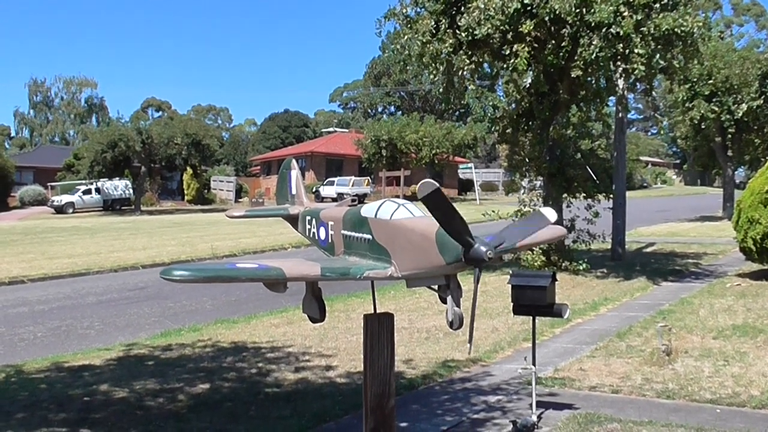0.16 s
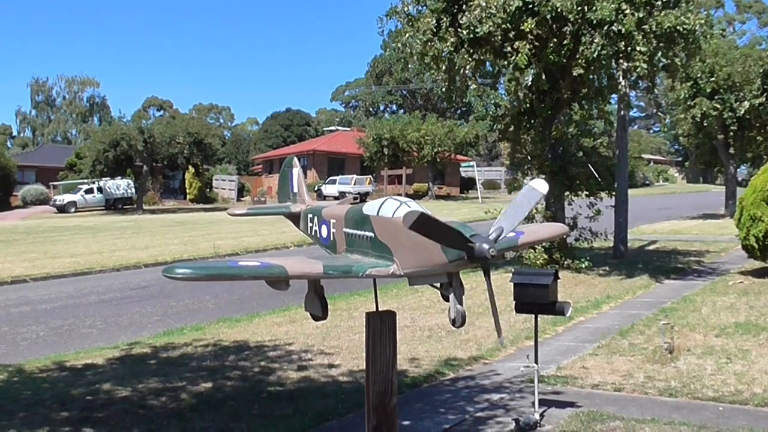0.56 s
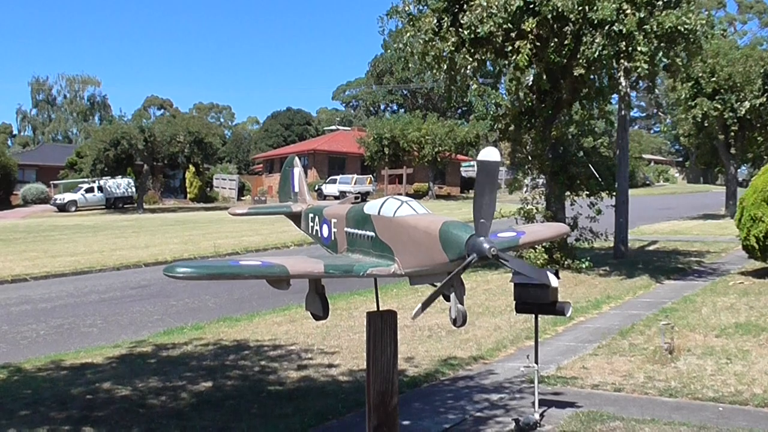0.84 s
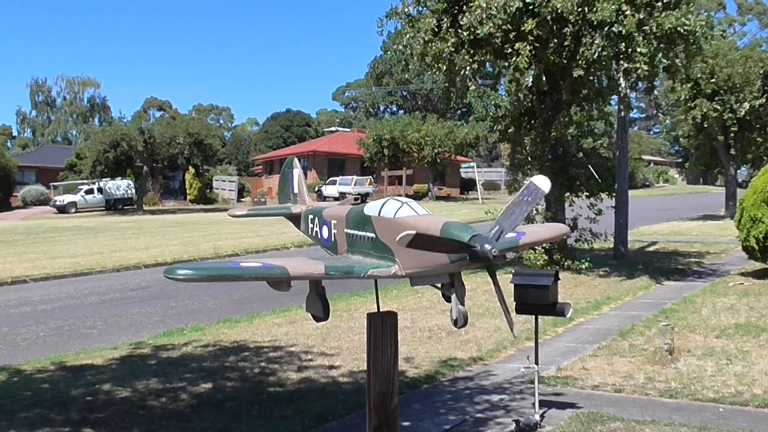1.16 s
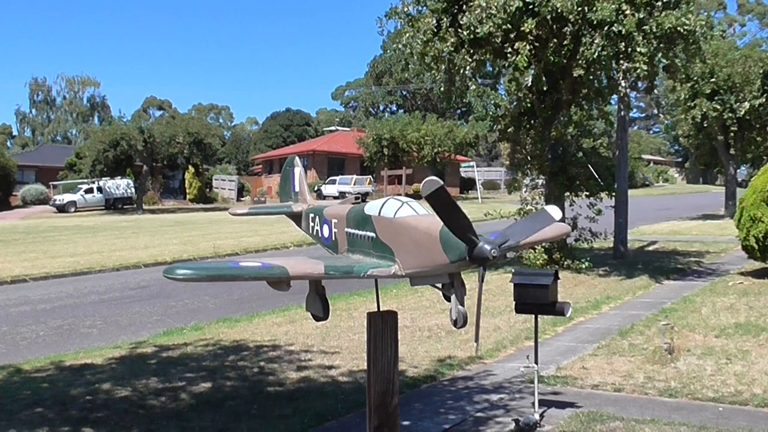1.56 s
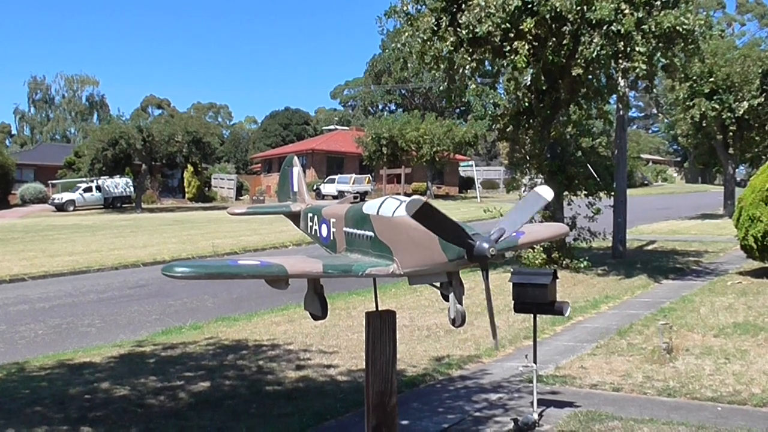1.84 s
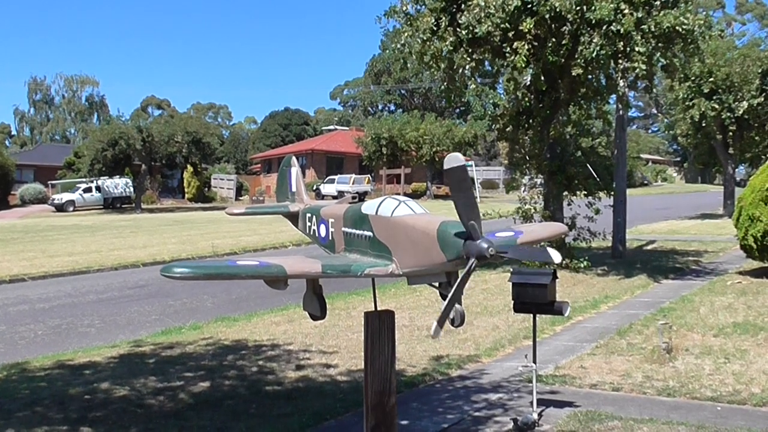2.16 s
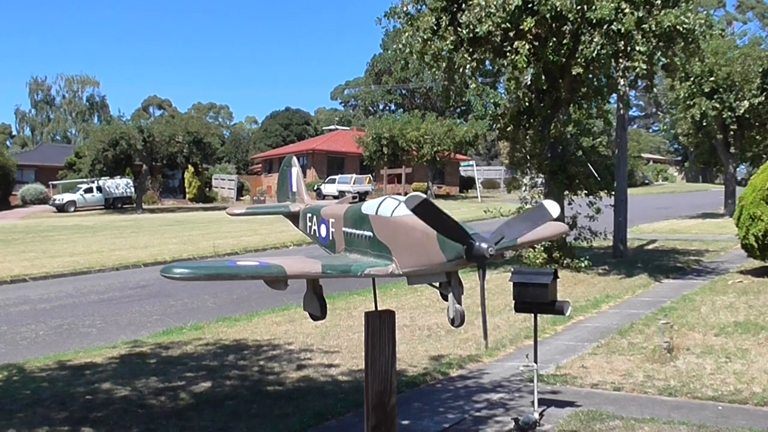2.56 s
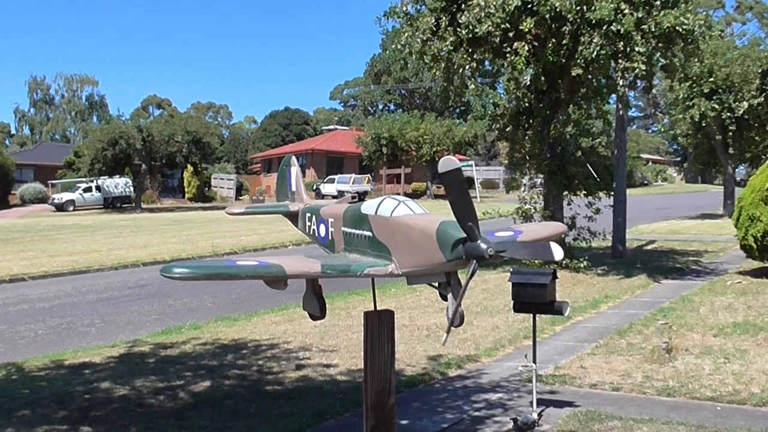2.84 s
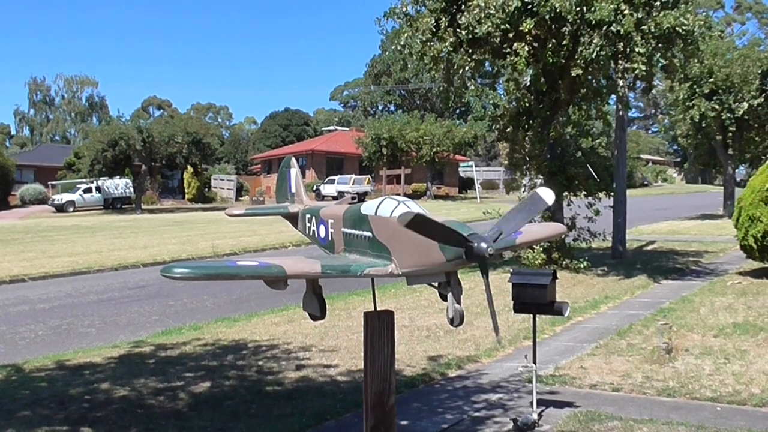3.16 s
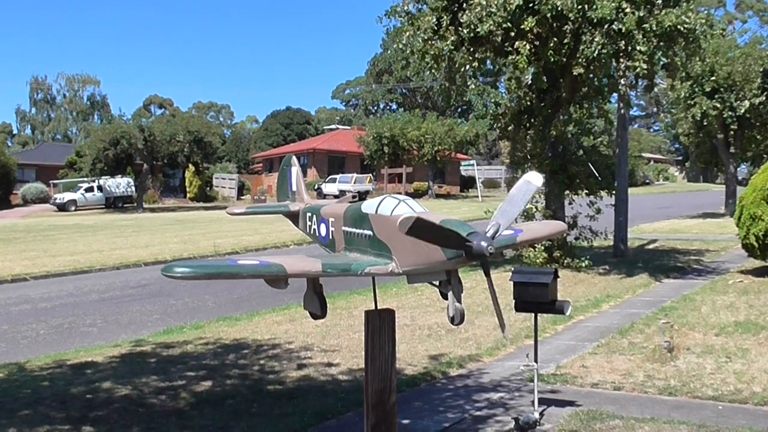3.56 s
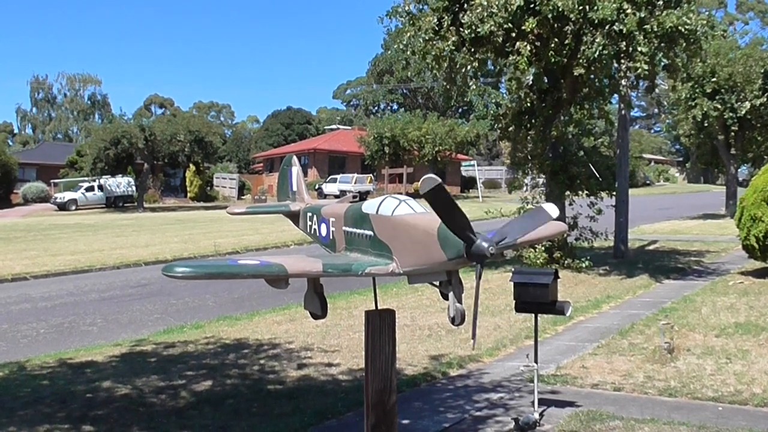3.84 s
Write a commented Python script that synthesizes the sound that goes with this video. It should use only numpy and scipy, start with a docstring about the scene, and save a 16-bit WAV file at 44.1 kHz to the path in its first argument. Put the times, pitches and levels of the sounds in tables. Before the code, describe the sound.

Wind buffets the microphone in gusts, with a whirligig's faint rattle and softly hissing leaves.

```python
"""Whirligig in a gusty yard

A model-aeroplane whirligig turns on a post: its loose propeller ticks and scrapes in the dry
bearing, and the shaft knocks the hollow body. Gusts buffet the two microphone ports, with a few
hard thumps from single eddies. Behind are a soft suburban hum, hissing leaves and faint birds."""
import sys
import numpy as np
from scipy.fft import rfft, irfft, next_fast_len
from scipy.io import wavfile
from scipy.ndimage import map_coordinates

SR = 44100
rng = np.random.default_rng(int(sys.argv[2]) if len(sys.argv) > 2 else 0)


def dump_mix(stems):
    """Bounce the given channels to the path in sys.argv[1] as a 16-bit WAV at rate SR."""
    frames = np.atleast_2d(stems).T  # one column per channel
    limited = np.clip(frames, -1, 1)  # hard clip at full scale
    pcm = np.round(limited * 32767).astype(np.int16)
    wavfile.write(sys.argv[1], SR, pcm)


N = 176400  # 4 s


def amp(db):
    """Decibels to gain."""
    return 10 ** (np.asarray(db) / 20)


def unit(x):
    """Scale to rms 1."""
    return x / np.sqrt(np.mean(x ** 2) + 1e-20)


def along(points, hz):
    """Read (freq_hz, value) points on a log axis."""
    freqs_hz, values = np.transpose(points)
    return np.interp(np.log(hz + 1), np.log(freqs_hz + 1), values)


def curves(rows):
    """One value per sample for each column after time_s."""
    time_s, *columns = np.transpose(rows)
    return [np.interp(np.arange(N) / SR, time_s, column) for column in columns]


def wobble(rate_hz):
    """Smooth random curve, rate_hz knots a second."""
    knots = rng.standard_normal(2048)
    return map_coordinates(knots, [np.arange(N) * rate_hz / SR], mode="wrap")


def filtered(x, response):
    """Apply a frequency response."""
    n = x.shape[-1]
    padded = next_fast_len(n + 4096)
    return irfft(rfft(x, padded) * response(np.fft.rfftfreq(padded, 1 / SR)), padded)[..., :n]


def tilted(x, db, pivot_hz):
    """Tilt by db per octave, out to one octave either side of the pivot."""
    return filtered(x, lambda hz: amp(db * np.clip(np.log2((hz + 1) / pivot_hz), -1, 1)))


def noise(spectrum, size=N, shift=1):
    """Coloured noise of rms 1; shift scales its frequencies."""
    return unit(filtered(rng.standard_normal(size), lambda hz: amp(along(spectrum, hz / shift))))


def stereo(mid, side, correlation, pan_db):
    """Mix two unrelated signals to a left-right pair; pan_db is left minus right."""
    angle = np.arccos(np.clip(correlation, -1, 1)) / 2
    mid, side = np.cos(angle) * mid, np.sin(angle) * side
    pair = np.array([(mid + side) * amp(pan_db / 2), (mid - side) * amp(-pan_db / 2)])
    return pair / np.sqrt((amp(pan_db) + amp(-pan_db)) / 2)


def add(track, start_s, sound):
    """Mix a sound into a track."""
    part = track[..., max(round(start_s * SR), 0):][..., :sound.shape[-1]]
    part += sound[..., :part.shape[-1]]


def ring(modes, t):
    """Damped modes; level, pitch and phase vary from blow to blow."""
    out = np.zeros(len(t))
    for hz, db, t60_s in modes:
        decay = amp(db + rng.normal(0, 3) - 60 * t / t60_s)
        out += decay * np.sin(2 * np.pi * (hz * rng.normal(1, 0.014) * t + rng.random()))
    return out


# Gust strength: time_s, level_db
GUSTS = [(0, -45), (0.25, -35.5), (0.41, -30), (0.6, -36.5), (0.7, -39), (0.78, -53), (0.95, -42.5),
         (1.1, -43.5), (1.3, -42.5), (1.42, -28.5), (1.6, -31.5), (1.7, -24.5), (1.88, -27.5),
         (1.97, -19.5), (2.12, -30.5), (2.29, -46.5), (2.37, -27.5), (2.49, -34.5), (2.59, -19.5),
         (2.7, -24.5), (2.84, -22.5), (3.0, -26.5), (3.24, -36), (3.5, -24.5), (3.63, -25.5), (3.7, -40.5),
         (3.82, -33), (4.0, -36.5)]
# Stereo image of the wind: time_s, pan_db, correlation
GUST_IMAGE = [(.3, -2.5, 0), (1.4, 2, 0.22), (1.62, -4.5, 0), (1.75, -0.5, 0.25), (2.0, -10.5, 0.02),
              (2.25, 9, 0.18), (2.4, -3.5, 0.14), (2.6, 4.5, 0.39), (2.75, 1.5, 1), (3.9, 0, 0.98)]
# Dull wide rumble and brighter centred buffeting: freq_hz, density_db
WIDE_SPECTRUM = [(15, -38), (30, -11), (55, -5), (90, 1), (150, -3), (240, -9.5), (400, -22), (600, -38),
                 (1500, -68)]
CENTRED_SPECTRUM = [(15, -45), (30, -13), (80, -2), (150, -3.5), (250, -2.5), (330, -6.5), (450, -14),
                    (600, -20.5), (1000, -34), (1500, -49), (4000, -93)]
WIDE_DB, CENTRED_DB = -1.5, -1
FLUTTER_DB, FLUTTER_HZ = 3, 70

def buffeting():
    """Turbulence on the ports flutters with small eddies; brighter where left and right become alike."""
    level_db, = curves(GUSTS)
    pan_db, correlation = curves(GUST_IMAGE)
    correlation = np.clip(correlation, 0, 1)
    def eddies():
        wide = amp(WIDE_DB) * np.sqrt(1 - correlation) * noise(WIDE_SPECTRUM)
        centred = amp(CENTRED_DB) * np.sqrt(correlation) * noise(CENTRED_SPECTRUM)
        return (wide + centred) * unit(amp(FLUTTER_DB * wobble(FLUTTER_HZ)))
    return amp(level_db) * stereo(eddies(), eddies(), correlation, pan_db)


# Left-right likeness of the background: freq_hz, correlation
YARD_CORRELATION = [(120, .2), (300, 1), (700, 1), (1400, 0.92), (5000, 0.97), (9000, 0.55), (14000, 0.13)]

def diffuse(spectrum):
    """Noise from all around, most alike left and right in the middle frequencies."""
    def weights(hz):
        angle = np.arccos(np.clip(along(YARD_CORRELATION, hz), -1, 1)) / 2
        return np.array([np.cos(angle), np.sin(angle)])
    mid, side = filtered(np.array([noise(spectrum), noise(spectrum)]), weights)
    return np.array([mid + side, mid - side])


# Suburban hum and leaf hiss: freq_hz, density_db
HUM_SPECTRUM = [(20, -16), (60, 6), (120, -8.5), (230, -4), (420, -2), (720, 1), (1120, -3.5),
                (1700, -11.5), (2600, -21.5), (4000, -44), (9000, -82)]
LEAF_SPECTRUM = [(1500, -46), (2700, -10), (3500, -6.5), (4300, -3), (5200, -1), (6100, -4.5), (7100, -10),
                 (8600, -11), (10000, -16.5), (12500, -19), (15800, -26)]
# Swell of the leaves: time_s, level_db
LEAF_SWELL = [(0, -58), (.8, -56.5), (1.5, -55), (2.3, -53.5), (3.1, -54), (4, -55)]
HUM_DB, YARD_PAN_DB = -46, 1.24

def yard():
    """The far-off suburb hums under the flickering hiss of the trees."""
    leaf_db, = curves(LEAF_SWELL)
    hum = amp(HUM_DB + wobble(2.96)) * diffuse(HUM_SPECTRUM)
    leaves = amp(leaf_db + 0.27 * wobble(4.65) + 0.75 * wobble(150)) * diffuse(LEAF_SPECTRUM)
    return (hum + leaves) * amp([[YARD_PAN_DB / 2], [-YARD_PAN_DB / 2]])


# Eddies hitting the ports squarely: peak_s, gain_db, swing_hz, decay_s, rasp_db, pan_db, correlation
EDDY_HITS = [(0.246, -21.5, 125, 0.0068, -10.5, 5, -0.8), (0.384, -23, 108, 0.014, 27, -2.5, -0.22),
             (0.426, -22, 157, 0.0067, -2, -1.5, 0.33), (0.519, -25, 105, 0.012, 28, 0.5, .4),
             (1.031, -23, 121, 0.0063, -10, -4, .6), (1.361, -16.5, 163.5, 0.007, -13.5, 2.5, -0.68),
             (1.518, -7.5, 212, 0.0019, -10, 3.5, -0.65), (1.678, -21, 124, 0.0099, -0.5, 0, 1),
             (1.953, -20, 149.7, .018, -5.5, -12, 0.23), (2.597, -17, 220.4, 0.02, -0.5, 12, 0.78),
             (2.667, -19, 205, 0.0055, -3, 7, 0.94), (2.868, -14.5, 239.5, 0.0079, -7, 0, 0.88),
             (2.907, -12.5, 215, 0.0034, 6, -1, 1), (3.135, -19.5, 189, 0.0055, -7, 0.5, 1),
             (3.354, -22, 128, 0.0061, -14, 0, 0.99), (3.509, -22, 205, 0.012, 8, 0.5, 0.81),
             (3.786, -12.5, 206, 0.008, 8, 0.5, 0.95)]
# Rasp of an eddy swinging at RASP_REF_HZ: freq_hz, density_db
RASP_SPECTRUM = [(30, -34), (100, 7.5), (200, 3), (330, 2), (600, -12.5), (1500, -32), (2400, -55),
                 (5000, -75)]
RASP_REF_HZ, THUMP_DB, RISE_RATIO = 197.6, -0.5, 0.48

def thumps():
    """Single eddies: a few pressure swings that swell and die quickly, some round, some rasping."""
    out = np.zeros((2, N))
    t = np.arange(-SR // 20, SR // 10) / SR
    for peak_s, gain_db, swing_hz, decay_s, rasp_db, pan_db, correlation in EDDY_HITS:
        envelope = 1 / np.cosh(t / np.where(t < 0, RISE_RATIO * decay_s, decay_s))
        phase = 2 * np.pi * (swing_hz * t + rng.random())
        pair = []
        for swing in (np.sin(phase), np.cos(phase)):
            rasp = amp(rasp_db) * noise(RASP_SPECTRUM, size=len(t), shift=swing_hz / RASP_REF_HZ)
            pair.append(unit(envelope * (swing + rasp)))
        gain = amp(gain_db + THUMP_DB) * np.sqrt(2 * decay_s / np.ptp(t))
        add(out, peak_s + t[0], gain * stereo(*pair, correlation, pan_db))
    return out


# Whistles and thin chirps: start_s, length_s, start_hz, end_hz, level_db
BIRD_CALLS = [(.39, .04, 8750, 9050, -75), (.44, .04, 8400, 8150, -72), (0.512, 0.039, 9100, 8800, -71),
              (0.523, 0.026, 1950, 2020, -58.5), (2.775, .155, 2596, 2350, -60.5),
              (2.989, 0.11, 2420, 2500, -63), (3.253, 0.05, 1980, 2240, -57),
              (3.885, 0.12, 1675, 1620, -60.5)]
WAVER_RATIO, FLICKER_DB = 0.023, 5

def birds():
    """Distant birds: soft gliding whistles that waver in pitch and level."""
    out = np.zeros(N)
    for start_s, length_s, start_hz, end_hz, level_db in BIRD_CALLS:
        n = int(length_s * SR)
        pitch_hz = np.linspace(start_hz, end_hz, n) * (1 + WAVER_RATIO * wobble(179)[:n])
        envelope = amp(FLICKER_DB * wobble(135)[:n]) * np.sin(np.linspace(0, np.pi, n))
        tone = np.sin(2 * np.pi * np.cumsum(pitch_hz) / SR)
        add(out, start_s, amp(level_db) * unit(envelope * tone))
    return out


# Propeller contacts in the bearing: start_s, gain_db, tilt_db
BEARING_TICKS = [(0.8944, -35.5, -4), (0.906, -34, 0), (0.9408, -30.5, -1), (1.0945, -35, -4),
                 (1.1636, -34, -4), (1.1675, -34, -4), (1.1859, -33, 2), (1.1923, -30.5, -0.5),
                 (2.0593, -25.5, -2), (2.076, -29.5, 2), (2.1337, -27.5, 5), (2.151, -22, 2.5),
                 (2.1626, -29.5, 1), (2.1792, -35, -3.5), (2.2085, -30.5, -1), (2.235, -25.5, -1.5),
                 (2.262, -32, -2), (2.2789, -32, -3), (2.2878, -29, 5), (2.3446, -30, -2),
                 (2.3585, -25.5, 4.5), (2.379, -25, 3), (2.397, -22.5, 1), (2.4137, -26.5, 1),
                 (2.4226, -34, -3), (2.4716, -29, 10), (2.4839, -22, 4), (2.5034, -28, 0),
                 (2.5154, -30.5, 7), (2.61, -32, 0), (2.622, -32.5, 1), (2.684, -39, 4), (2.7073, -29, 2),
                 (2.7612, -34.5, 3), (3.058, -36, 0), (3.1955, -33.5, -1), (3.3505, -35.5, 2),
                 (3.375, -28, 3.5), (3.4358, -34.5, -2), (3.569, -34.5, 5)]
# Hub resonances: freq_hz, gain_db, t60_s
HUB_MODES = [(3040, -7.5, 0.017), (4750, -6, 0.011), (5110, -2, 0.016), (5630, -.5, 0.013),
             (8460, 0.5, 0.0074)]
# Dry contact noise: freq_hz, density_db
CRACK_SPECTRUM = [(2000, -2.5), (3000, -4), (5200, 8), (7000, -0.5), (8600, 5), (10200, -4), (12200, -12),
                  (15000, -30)]
# Tick balance: freq_hz, pan_db
TICK_BALANCE = [(3000, 3), (6000, -1.5), (8400, 10), (12000, -3)]
# Tick phase between the ports: freq_hz, left_lead_rad
TICK_LEAD = [(7000, -1.8), (9400, -2.5), (11500, -2)]
TICK_DB, TICK_ATTACK_S = -22, 0.00065
CRACK_DB, CRACK_T60_S, CRACK_SHIFT_SPREAD = 3.5, 0.0095, 0.085
REBOUND_MEAN_S, REBOUND_DB = 0.008, -12.5

def rattle():
    """The loose propeller ticks: a dry crack, a short ring of the hub, then a light rebound."""
    out, t = np.zeros(N), np.arange(SR // 12) / SR
    attack = 1 - np.exp(-(t / TICK_ATTACK_S) ** 2)
    def contact(tilt_db):
        shift = np.exp(CRACK_SHIFT_SPREAD * rng.standard_normal())
        crack = noise(CRACK_SPECTRUM, size=len(t), shift=shift) * amp(CRACK_DB - 60 * t / CRACK_T60_S)
        return unit(tilted((ring(HUB_MODES, t) + crack) * attack, tilt_db, pivot_hz=8100))
    for start_s, gain_db, tilt_db in BEARING_TICKS:
        add(out, start_s, amp(gain_db + TICK_DB) * contact(tilt_db))
        rebound_s = start_s + REBOUND_MEAN_S * (0.5 + rng.random())
        add(out, rebound_s, amp(gain_db + TICK_DB + REBOUND_DB) * contact(tilt_db))
    def to_ports(hz):
        split = np.array([[0.5], [-0.5]])
        return amp(split * along(TICK_BALANCE, hz)) * np.exp(1j * split * along(TICK_LEAD, hz))
    return filtered(out, to_ports)


# Bearing scrape: time_s, level_db
CHATTER_LEVEL = [(1.95, -80), (2.05, -59.5), (2.2, -59), (2.42, -51.5), (2.55, -54), (2.75, -83)]
CATCH_RATE_HZ, CATCH_SPREAD_DB = 350, 8

def chatter():
    """The shaft catches and scrapes in the dry bearing."""
    level_db, = curves(CHATTER_LEVEL)
    scrape = noise(CRACK_SPECTRUM)
    catches = amp(CATCH_SPREAD_DB * wobble(CATCH_RATE_HZ))
    return amp(level_db) * unit(scrape * catches)


# Shaft blows on the body: start_s, gain_db, tilt_db
SHAFT_KNOCKS = [(2.149, -27, -11.5), (2.265, -33, 1), (2.454, -28, 0.5), (2.533, -29, 1),
                (2.637, -29.5, 1.5)]
# Hollow body resonances: freq_hz, gain_db, t60_s
BODY_MODES = [(621, 1, 0.1), (1046, 4.5, .12), (1250, -4, 0.083), (1460, 6, 0.048), (1834, -6, 0.084)]
# Shaft rubbing the body: freq_hz, density_db
SCUFF_SPECTRUM = [(400, -10), (1000, 1), (1550, -0.5), (1950, -12), (2300, 0.5), (2900, -27), (6000, -45)]
KNOCK_DB, KNOCK_ATTACK_S = -21.5, 0.004
SCUFF_DB, SCUFF_T60_S = -0.5, 0.14

def knocks():
    """The shaft bumps and scuffs the hollow fuselage, dully at first, then brighter."""
    out, t = np.zeros(N), np.arange(SR // 5) / SR
    attack = 1 - np.exp(-t / KNOCK_ATTACK_S)
    for start_s, gain_db, tilt_db in SHAFT_KNOCKS:
        scuff = noise(SCUFF_SPECTRUM, size=len(t)) * amp(SCUFF_DB - 60 * t / SCUFF_T60_S)
        knock = (ring(BODY_MODES, t) + scuff) * attack
        add(out, start_s, amp(gain_db + KNOCK_DB) * unit(tilted(knock, tilt_db, pivot_hz=1900)))
    return out


def scene():
    """Wind on the ports over the whirligig and the yard."""
    return buffeting() + thumps() + yard() + rattle() + chatter() + knocks() + birds()


# Stereo width above the bass: time_s, side_db
IMAGE_WIDTH = [(0, 3), (2.05, -6.5), (2.55, -8.5), (2.8, -28), (4, -36)]
BASS_SPLIT_HZ, CUTOFF_HZ = 620, 15850

def record(dry):
    """Above the bass the image narrows to near mono by 2.8 s; the top treble is cut off."""
    mid, side = (dry[0] + dry[1]) / 2, (dry[0] - dry[1]) / 2
    side_bass = filtered(side, lambda hz: 1 / (1 + (hz / BASS_SPLIT_HZ) ** 2) ** 2)
    side_db, = curves(IMAGE_WIDTH)
    side = side_bass + amp(side_db) * (side - side_bass)
    return filtered(np.array([mid + side, mid - side]), lambda hz: hz < CUTOFF_HZ)


dry = scene()
out = record(dry)
dump_mix(out)
```